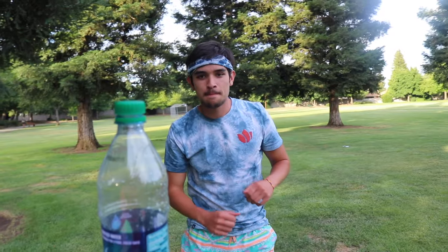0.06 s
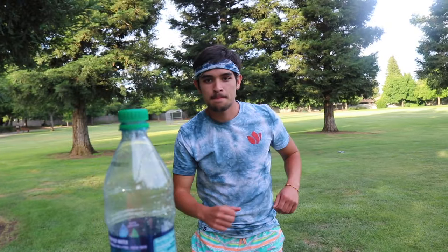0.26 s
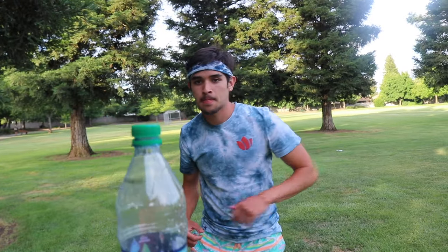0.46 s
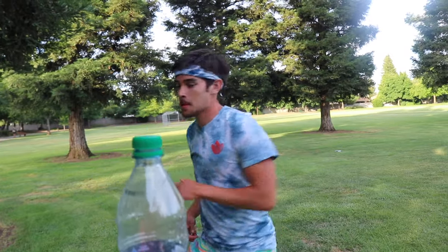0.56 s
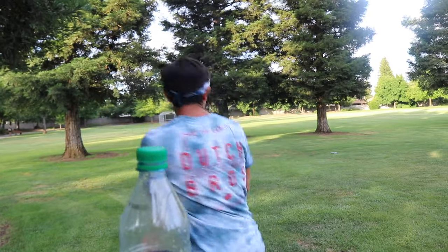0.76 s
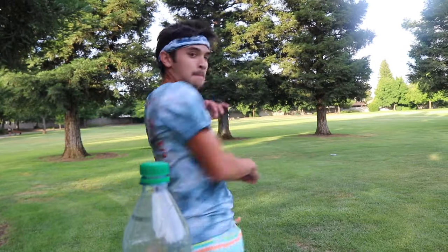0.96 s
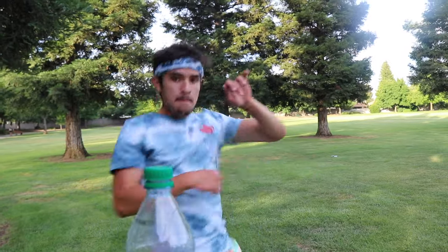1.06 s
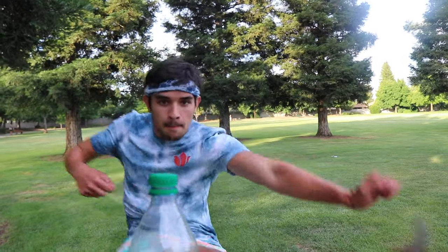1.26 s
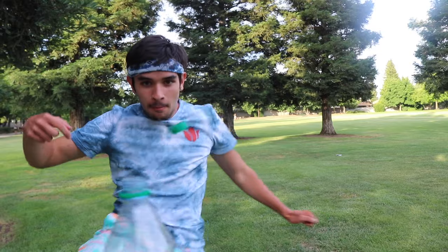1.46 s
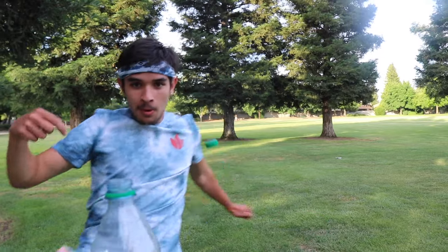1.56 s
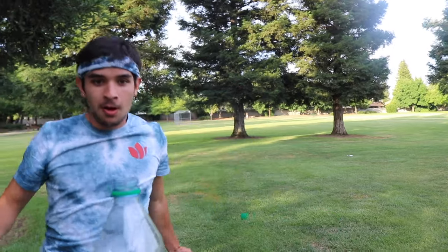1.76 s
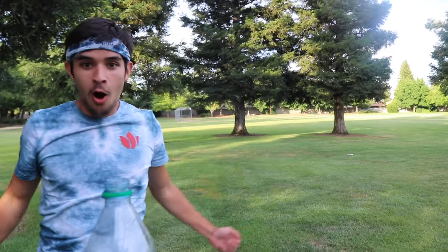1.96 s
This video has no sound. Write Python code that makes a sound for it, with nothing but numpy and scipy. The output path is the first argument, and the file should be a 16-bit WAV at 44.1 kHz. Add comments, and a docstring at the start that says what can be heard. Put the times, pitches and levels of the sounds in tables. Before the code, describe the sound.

A kick cracks the cap off a plastic bottle, followed by a dull knock.

```python
"""Bottle cap kick in a park

Wind buffets the microphone ports while clothes and shoes swish over the grass. A spinning kick
cracks the cap off a plastic bottle close by; the bottle rings and distant trees echo the crack.
Dull knocks follow as the leg comes down. Both hits overload the recorder and duck its gain."""
import sys
import numpy as np
from scipy import signal
from scipy.fft import rfft, irfft
from scipy.io import wavfile

SR = 44100
rng = np.random.default_rng(int(sys.argv[2]) if len(sys.argv) > 2 else 0)


def materialize(psi):
    """Save the field psi as 16-bit PCM at rate SR to the path in sys.argv[1].

    A 1-D psi becomes a single channel; in a 2-D psi each row is a channel.
    """
    bounded = np.clip(np.atleast_2d(psi).T, -1, 1)
    quanta = np.round(bounded * 32767).astype(np.int16)
    wavfile.write(sys.argv[1], SR, quanta)


N = 88729
TIME = np.arange(N) / SR

# Bed of distant traffic and leaves: freq_hz, density_db
PARK_COLOUR = [(20, -22), (60, 3.5), (130, 1), (240, -9.5), (380, -2.5), (700, -10), (1200, -10),
               (1700, -20), (2400, -23), (4800, -32), (9500, -30.5), (15000, -39.5)]
# Stereo image, centred lows and wide highs: freq_hz, left_right_likeness
STEREO_LIKENESS = [(60, 0.98), (300, 1), (640, 0.47), (1400, 0.22), (3000, 0.33), (7000, 0.2), (15000, .15)]
PARK_DB = -39

# Rise and fall of the wind: time_s, level_db
WIND_CONTOUR = [(0, -33.5), (.2, -27), (.32, -32.5), (.55, -33), (.68, -31.5), (.8, -39), (.85, -34.5),
                (.89, -26), (.98, -32.5), (1.07, -43), (1.2, -63), (1.33, -36), (1.43, -61), (1.8, -56),
                (1.95, -49)]
# Its low rumble: freq_hz, density_db
RUMBLE_COLOUR = [(20, -17), (50, 1), (120, 1), (190, -6), (300, -13.5), (500, -29.5), (1000, -41),
                 (3000, -57)]
# Single buffets on the ports: centre_s, half_width_s, level_db
GUSTS = [(0.058, 0.015, -21.5), (0.101, 0.0064, -22.5), (0.146, 0.011, -23.5), (0.184, 0.018, -22),
         (0.366, 0.0047, -20), (0.396, 0.0038, -24.5), (0.444, 0.0073, -24.5), (.495, 0.0045, -25.5),
         (.595, 0.0083, -25), (0.66, 0.011, -30), (1.011, 0.0054, -28.5)]
# Their brighter tone: freq_hz, density_db
GUST_COLOUR = [(20, -6), (60, 2.5), (130, 2.5), (220, -2.5), (330, -8.5), (500, -24.5), (1000, -45),
               (3000, -58)]
WIND_DB, WIND_PAN_DB, WIND_LUMP_DB, WIND_LIKENESS = -4, -16.5, 2.5, 0.76

# Snaps and scuffs underfoot: peak_s, rustle_db, hiss_db
FOOT_SNAPS = [(0.271, -33, -40), (.635, -35, -58), (0.901, -41, -40), (1.161, -34.5, -60),
              (1.806, -34, -60)]
# Swishes of cloth and grass: centre_s, half_width_s, rustle_db, hiss_db
SWISH_MOVES = [(.58, 0.053, -46.5, -50.5), (0.669, 0.028, -36, -43.5), (.735, .035, -43.5, -48),
               (0.887, 0.065, -43, -50), (0.953, 0.028, -41, -44), (1.04, 0.025, -42.5, -48.5),
               (1.096, 0.021, -40, -43.5), (1.16, 0.037, -43, -50), (1.24, 0.038, -39, -46.5),
               (1.31, 0.022, -48, -54), (1.38, 0.036, -37.5, -45), (1.692, 0.022, -39.5, -43.5),
               (1.81, 0.063, -45.5, -50), (1.895, 0.038, -44, -44.5)]
# Body of a swish: freq_hz, density_db
RUSTLE_COLOUR = [(200, 11.5), (500, -2.5), (1200, 2.5), (1800, -1.5), (2500, -0.5), (4000, -4), (6000, -20),
                 (12000, -78)]
# Its airy top: freq_hz, density_db
HISS_COLOUR = [(2000, -7), (5000, -7.5), (7000, 1.5), (9500, 1.5), (12000, -5), (16000, -9.5)]
SWISH_GRAIN_DB, SWISH_PAN_DB, SNAP_T60_S = 2, -2.5, 0.018

# The shoe meets the cap, which rattles off the neck: peak_s, level_db
CAP_CONTACTS = [(1.4077, -6.5), (1.409, 1), (1.4123, -9), (1.4120, -23)]
# Ring of bottle and cap: pitch_hz, level_db, t60_s
BOTTLE_MODES = [(420, 6, 0.0089), (690, -2, 0.018), (918, -1.5, 0.026), (1140, -4.5, 0.033),
                (1360, -8, 0.026), (1990, -8, 0.025), (2256, -5.5, 0.055), (2360, -4.5, 0.025),
                (2826, -9, 0.054), (2955, -8, 0.054), (3090, -12, 0.051), (3390, -14, 0.066),
                (4970, -25, 0.031), (6320, -14, 0.036), (8100, -8, 0.026)]
# Bright crack of plastic: freq_hz, density_db
CRACK_COLOUR = [(150, -12), (400, 0.5), (1600, -5), (2400, 1), (3100, -0.5), (4000, -14.5), (8200, -9.5),
                (12000, -17.5), (16000, -13.5)]
BOTTLE_DB, CRACK_DB, CRACK_T60_S = 1.5, 5.5, 0.011
KICK_PAN_DB, KICK_LOW_CUT_HZ, KICK_LAG_S = -2.5, 322, -0.00002

# Returns from ground and trees: peak_s, level_db, rise_s, t60_s
REFLECTIONS = [(1.4210, -8, 0.005, 0.046), (1.444, -33, 0.0066, 0.32), (1.488, -31.5, .001, .06),
               (1.548, -32.5, 0.0046, 0.052), (1.594, -40.5, 0.0055, 0.099), (1.642, -38.5, 0.0012, 0.033)]
# Their softer tone: freq_hz, density_db
REFLECTION_COLOUR = [(200, -13), (500, -2.5), (1500, -6), (2300, -0.5), (3200, 1.5), (4100, -7.5),
                     (6500, -11), (10000, -16.5), (16000, -29)]

# Quick run of dull knocks: start_s, thud_db, clack_db, tick_db
KNOCK_HITS = [(1.6842, -19, -24.5, -42), (1.6991, -5.5, -9.5, -20.5), (1.7123, 12.5, -3.5, -28),
              (1.7245, 1.5, -18, -14.5)]
# Low resonance of a knock: pitch_hz, level_db, t60_s
THUD_MODES = [(415, -3.5, 0.012)]
# Its upper resonances: pitch_hz, level_db, t60_s
CLACK_MODES = [(876, -7.3, 0.014), (1550, -2.3, 0.0074)]
# Grit on its attack: freq_hz, density_db
TICK_COLOUR = [(500, 0), (2700, 1), (4400, -7), (6500, -6), (9200, 6.5), (12000, -11), (16000, -22)]
TICK_T60_S, KNOCK_PAN_DB, KNOCK_LAG_S = 0.0066, 0.5, 0.0001
KNOCK_BAND_HZ = (236, 2100)

LIMIT_DB, LIMIT_ATTACK_S, LIMIT_RELEASE_DB_PER_S = -1.5, 0.0022, 88
STOPBAND_HZ = 17100


def from_db(db):
    """Decibels to gain."""
    return 10 ** (np.asarray(db) / 20)


def unit_rms(x):
    """Scale to an rms of 1."""
    return x / np.sqrt(np.mean(x ** 2) + 1e-20)


def pan(db):
    """Left and right gains for a left-minus-right level."""
    return from_db(np.array([[db], [-db]]) / 2)


def two_ports(x, lag_s):
    """A sound that reaches the right port lag_s after the left."""
    return np.array([x, np.interp(TIME - lag_s, TIME, x)])


def at_hz(points, hz):
    """Read a table on a log-frequency axis."""
    freqs, values = np.transpose(points)
    return np.interp(np.log(hz + 1), np.log(freqs), values)


def noise(colour, likeness=None):
    """Stereo noise of a given colour and left-right likeness; rms 1."""
    hz = np.arange(N // 2 + 1) * SR / N
    alike = at_hz(STEREO_LIKENESS, hz) if likeness is None else likeness
    mid, side = rfft(rng.standard_normal((2, N)))
    stereo = np.sqrt(1 + alike) * mid + np.sqrt(1 - alike) * side * np.array([[1], [-1]])
    return unit_rms(irfft(stereo * from_db(at_hz(colour, hz)), N))


def flutter(rate_hz):
    """Random wavering, mostly slower than rate_hz; rms 1."""
    smooth = signal.butter(2, rate_hz, fs=SR, output="sos")
    return unit_rms(signal.sosfilt(smooth, rng.standard_normal(N)))


def swells(rows):
    """Envelope of bell-shaped swells that add in power."""
    power = 0
    for centre_s, half_width_s, db in rows:
        bell = np.exp(-np.minimum(((TIME - centre_s) / half_width_s) ** 2, 60))
        power += bell * from_db(db) ** 2
    return np.sqrt(power)


def burst(peak_s, t60_s, rise_s):
    """Envelope that climbs to 1 at peak_s and dies away."""
    attack = np.exp(np.minimum(TIME - peak_s, 0) / rise_s)
    return attack * from_db(-60 * np.maximum(TIME - peak_s, 0) / t60_s)


def ring(start_s, modes):
    """Damped sines struck at start_s."""
    age = np.maximum(TIME - start_s, 0)
    return sum(from_db(db - 60 * np.minimum(age / t60, 10)) * np.sin(2 * np.pi * hz * age)
               for hz, db, t60 in modes)


def park():
    """Distant traffic and leaves blur into a steady bed."""
    return from_db(PARK_DB) * noise(PARK_COLOUR)


def wind():
    """Air hits the ports, mostly the right: a lumpy rumble with brighter buffets."""
    contour = from_db(np.interp(TIME, *np.transpose(WIND_CONTOUR)))
    rumble = noise(RUMBLE_COLOUR, WIND_LIKENESS)
    lumps = from_db(WIND_LUMP_DB * flutter(rate_hz=48))
    gusts = swells(GUSTS) * noise(GUST_COLOUR, WIND_LIKENESS)
    return from_db(WIND_DB) * pan(WIND_PAN_DB) * (contour * unit_rms(rumble * lumps) + gusts)


def swishes():
    """Cloth and grass brush in swells of grainy rustle and fine hiss, with snaps underfoot."""
    rustle = swells((s, width, db) for s, width, db, _ in SWISH_MOVES)
    hiss = swells((s, width, db) for s, width, _, db in SWISH_MOVES)
    for peak_s, rustle_db, hiss_db in FOOT_SNAPS:
        snap = burst(peak_s, SNAP_T60_S, rise_s=0.00038)
        rustle += from_db(rustle_db) * snap
        hiss += from_db(hiss_db) * snap
    grain = from_db(SWISH_GRAIN_DB * flutter(rate_hz=230))
    return pan(SWISH_PAN_DB) * grain * (rustle * noise(RUSTLE_COLOUR) + hiss * noise(HISS_COLOUR))


def kick():
    """Every contact cracks the plastic; the hardest rings the bottle, too small a body for bass."""
    hardest_s = CAP_CONTACTS[1][0]
    body = from_db(BOTTLE_DB) * ring(hardest_s, BOTTLE_MODES)
    crack_power = sum((from_db(CRACK_DB + db) * burst(s, CRACK_T60_S, rise_s=0.0001)) ** 2
                      for s, db in CAP_CONTACTS)
    crack = np.sqrt(crack_power) * noise(CRACK_COLOUR)[0]
    low_cut = signal.butter(3, KICK_LOW_CUT_HZ, "high", fs=SR, output="sos")
    return pan(KICK_PAN_DB) * signal.sosfilt(low_cut, two_ports(body + crack, KICK_LAG_S))


def echoes():
    """Ground and trees scatter the crack back as short smears and a faint tail."""
    envelope = sum(from_db(db) * burst(s, t60, rise) for s, db, rise, t60 in REFLECTIONS)
    return envelope * noise(REFLECTION_COLOUR, likeness=0.21)


def knocks():
    """The leg comes down: each knock is a damped thud with a clack and a gritty tick on top."""
    body = tick_envelope = 0
    for start_s, thud_db, clack_db, tick_db in KNOCK_HITS:
        body += from_db(thud_db) * ring(start_s, THUD_MODES)
        body += from_db(clack_db) * ring(start_s, CLACK_MODES)
        tick_envelope += from_db(tick_db) * burst(start_s, TICK_T60_S, rise_s=0.00025)
    band = signal.butter(2, KNOCK_BAND_HZ, "band", fs=SR, output="sos")
    dull_body = two_ports(signal.sosfilt(band, body), KNOCK_LAG_S)
    ticks = tick_envelope * noise(TICK_COLOUR, likeness=0.3)
    return pan(KNOCK_PAN_DB) * (ticks - dull_body)


def scene():
    """Park and wind under the movement and the two hits."""
    return park() + wind() + swishes() + kick() + echoes() + knocks()


def record(dry):
    """A limiter ducks after loud peaks, too late to stop them clipping; the very top is cut."""
    peak_db = 20 * np.log10(np.abs(dry).max(axis=0) + 1e-9)
    over_db = np.maximum(peak_db - LIMIT_DB, 0)
    recovery_db = LIMIT_RELEASE_DB_PER_S * TIME
    held_db = np.maximum.accumulate(over_db + recovery_db) - recovery_db  # catch peaks, let go steadily
    pole = np.exp(-1 / (LIMIT_ATTACK_S * SR))
    duck_db = signal.lfilter([1 - pole], [1, -pole], held_db)
    clipped = np.clip(dry * from_db(-duck_db), -1, 1)
    high_cut = signal.cheby2(12, 76, STOPBAND_HZ, fs=SR, output="sos")
    return signal.sosfilt(high_cut, clipped)


dry = scene()
out = record(dry)
materialize(out)
```